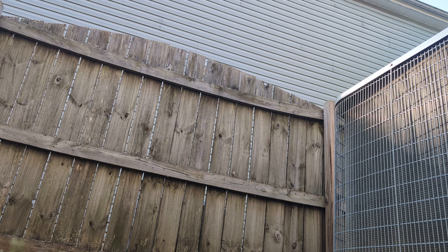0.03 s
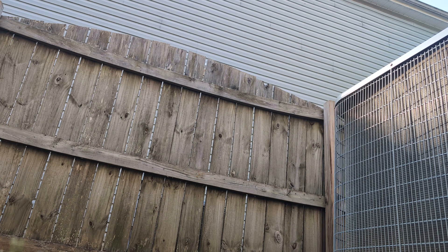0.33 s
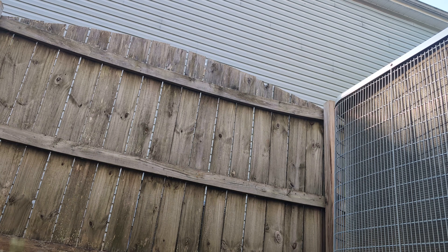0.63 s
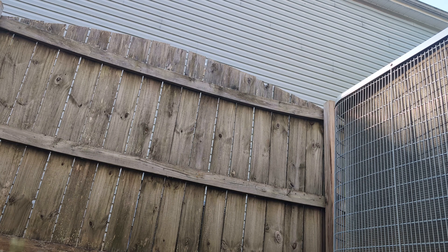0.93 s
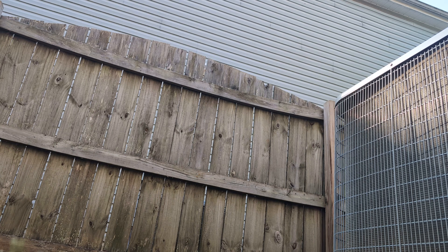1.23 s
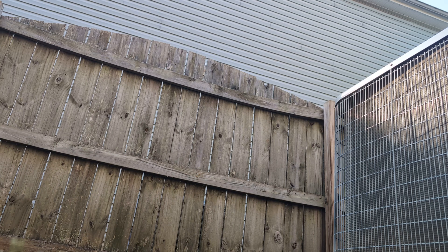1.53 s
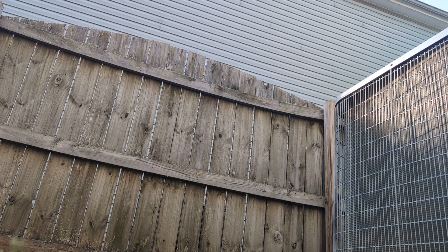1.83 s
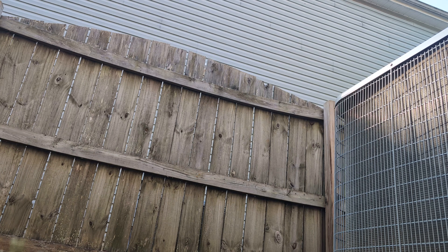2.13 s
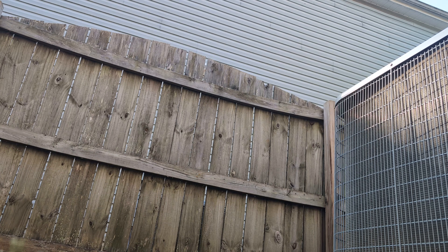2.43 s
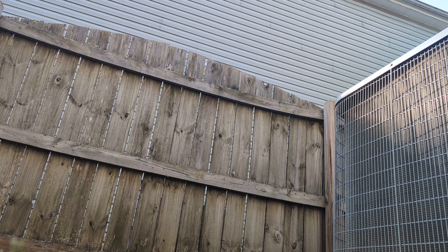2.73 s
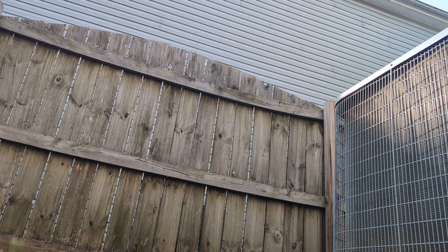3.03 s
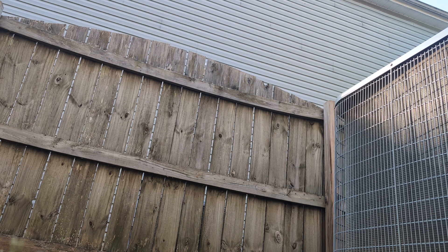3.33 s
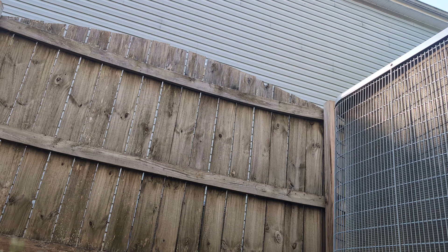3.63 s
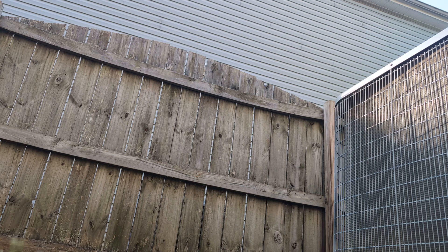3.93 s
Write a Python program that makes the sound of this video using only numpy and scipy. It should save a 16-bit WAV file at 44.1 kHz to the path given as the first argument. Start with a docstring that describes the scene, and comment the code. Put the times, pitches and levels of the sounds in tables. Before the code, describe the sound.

An outdoor air conditioner hums steadily, slightly to the right, with a fine buzz and rushing fan. At about 2.6 seconds it ticks off and the hum sinks, with a soft fizz of gas. Near 3 seconds the compressor clunks, then knocks and rattles ever more slowly, with a short, high whistling hiss. The fan coasts down, leaving faint knocks and a low yard rumble by 4 seconds.

```python
"""In a yard, beside a wooden fence, an air conditioner hums: compressor tones, a fine buzz and a
four-blade fan. The power drops out with a tick. The compressor (the pump for the cooling gas) stalls
with a clunk, knocks ever more slowly on its rebound and lets off a short whistling hiss, while the
fan coasts down into the low rumble of the yard."""
import sys
import numpy as np
from scipy import signal
from scipy.fft import rfft, irfft
from scipy.io import wavfile
from scipy.ndimage import map_coordinates

SR = 44100
rng = np.random.default_rng(int(sys.argv[2]) if len(sys.argv) > 2 else 0)


def master(y):
    """Save y as 16-bit WAV."""
    cut = np.clip(np.atleast_2d(y).T, -1, 1)
    pcm = np.round(cut * 32767)  # scale
    wavfile.write(sys.argv[1], SR, pcm.astype(np.int16))


N = 176400
T = np.arange(N) / SR
FREQS = np.maximum(np.fft.rfftfreq(2 * N, 1 / SR), 1)

OFF_S = 2.61  # the power is cut
SHAFT_HZ, BLADE_HZ, MAINS_HZ = 59.06, 74.7, 60


def compressor():
    """The shaft drones and buzzes, the motor hums; without power the shaft slows and all three fade."""
    # shaft tones (multiple of the shaft rate, level [dB])
    shaft_tones = [(1, -42), (6, -39.5), (7, -45), (8, -39.5), (9, -42), (10, -38), (12, -35.5), (13, -39),
                   (14, -36), (15, -41.5), (17, -47), (18, -46), (19, -33.5), (20, -43), (21, -35),
                   (22, -40.5), (24, -52.5)]
    # electric hum (multiple of the mains frequency, level [dB])
    hum_tones = [(2, -43.5), (4, -40)]
    # tone colour of the buzz (frequency [Hz], level [dB per Hz])
    buzz_spectrum = [(1000, -97), (1600, -76.5), (2400, -85.5), (3300, -94), (3900, -81), (4400, -83.5),
                     (4750, -88), (5250, -86.5), (6000, -84), (6400, -86.5), (7400, -90.5), (8600, -101),
                     (9600, -95), (11000, -99), (11700, -87), (12300, -102), (15000, -100)]
    # where the panels ring along (frequency [Hz], width [Hz], boost [dB])
    panels = [(2790, 92, 5.5), (3957, 91, -0.5), (5141, 80, 7.5), (5500, 120, 6), (5930, 260, 6.5),
              (6900, 80, 6)]
    stall_s, tone_fade_s, buzz_fade_s = 0.38, 0.2, 0.037
    age = since(OFF_S)
    hz = SHAFT_HZ * np.clip(1 - age / stall_s, 0, 1) * (1 + 0.000243 * walk(1.86))
    turn = np.cumsum(hz) / SR % 1
    boost_db = sum(db / (1 + (2 * (FREQS - centre) / width) ** 2) for centre, width, db in panels)
    buzz = colour(np.array([scrape(turn), scrape(turn)]), buzz_spectrum)
    buzz = filtered(buzz, amp(boost_db))
    hum = tones(np.full(N, MAINS_HZ), hum_tones, waver_db=2.5, waver_hz=4.8)
    shaft = tones(hz, shaft_tones, waver_db=0.5, waver_hz=2.0) * np.exp(-age / tone_fade_s)
    return (buzz + direct(hum)) * np.exp(-age / buzz_fade_s) + direct(shaft * np.sqrt(hz / SHAFT_HZ))


def scrape(turn):
    """The shaft makes the same rough rub on every turn, with a little random grit on top."""
    # rubs within one turn (position [turns], strength, width [turns])
    rubs = [(.15, 0.55, 0.042), (.25, 0.32, 0.11), (.5, 0.23, 0.049), (.8, 0.31, 0.057)]
    size = int(SR / SHAFT_HZ)
    angle = np.arange(size) / size
    pressure = 0.24 + sum(force * np.exp(-((angle - at) / width) ** 2) for at, force, width in rubs)
    phases = np.angle(rfft(pressure * rng.standard_normal(size)))
    cycle = irfft(np.exp(1j * phases), size)  # all overtones equally strong
    grit = 1 + 0.3 * rng.standard_normal(N)
    return map_coordinates(cycle / cycle.std(), [turn * size], mode="grid-wrap") * grit


def fan():
    """The blades hum and stir the air; as drag slows them, the hum sinks and the rush fades."""
    # blade tones (multiple of the blade rate, level [dB])
    blade_tones = [(.5, -57), (1, -24), (1.5, -36), (2, -39.5), (2.5, -40.5), (3, -37.5), (3.5, -49),
                   (4, -44.5)]
    # loudness of those tones (time [s], level [dB])
    blade_level = [(0, -2), (1, 0), (2.0, 0), (2.6, -1), (2.66, -10), (2.74, 3), (2.81, 0.5), (2.88, -5),
                   (3.2, -14), (4, -21)]
    # rushing air (frequency [Hz], level [dB per Hz])
    air_spectrum = [(20, -74.5), (35, -70), (50, -88), (66, -59.5), (110, -56), (160, -53.5), (240, -53),
                    (350, -57.5), (600, -58.5), (800, -62.5), (1000, -63), (1270, -67.5), (1550, -71.5),
                    (2200, -82), (4000, -86.5), (6000, -94.5), (8300, -111), (15500, -118)]
    half_speed_s = 2.0
    speed = 1 / (1 + since(OFF_S) / half_speed_s)
    hz = BLADE_HZ * speed * (1 + 0.0011 * walk(4.8))
    blades = tones(hz, blade_tones, waver_db=0.57, waver_hz=7.9)
    air = noise(air_spectrum) * amp(0.47 * walk(11.7))
    return direct(blades * fader(blade_level)) + air * speed ** 3


def knocks():
    """Each knock of the compressor cracks, rings its metal shell and sets the cabinet clattering."""
    # knocks (time [s], level [dB], extra for low notes [dB], clatter and crack [dB])
    hits = [(2.928, -21, 19, -20), (2.9712, 3, 5, -2), (2.9802, -13, 8, -5), (3.026, -6.5, -16, -9),
            (3.0592, -14, -12, -1), (3.0932, -9, -16, -16), (3.1395, -14, -10, -20), (3.1861, -10, -1, -7),
            (3.2413, -8.5, -2.5, -8), (3.605, -23, 7, -14), (3.912, -31, 14, -25)]
    # notes of the shell (frequency [Hz], level [dB], time to fade 60 dB [s], swell [s])
    shell_notes = [(446, -24, 0.059, .001), (583, -12.5, 0.019, 0.00045), (880, -20, 0.041, .001),
                   (1176, -6.5, 0.038, 0.00184), (1270, -17.5, 0.09, 0.002), (1347, -20, 0.067, .002),
                   (1800, -23.5, .06, 0.0027), (2008, -19.5, 0.064, 0.0068), (2824, -33.5, 0.14, 0.0015),
                   (3540, -36, 0.078, .001), (3820, -31, 0.045, .001), (4330, -33.5, 0.036, .001),
                   (6040, -45, .1, .002), (6550, -37, 0.022, 0.002)]
    # clattering cabinet (frequency [Hz], level [dB per Hz])
    clatter_spectrum = [(200, -66), (500, -58), (800, -38.5), (1020, -46), (1280, -38.5), (1560, -61),
                        (2000, -47.5), (2400, -62.5), (2850, -57), (3300, -67), (3780, -55.5), (4080, -66),
                        (4380, -62), (4900, -71.5), (5600, -69), (6600, -65), (8700, -80.5), (11700, -70),
                        (13000, -83), (15500, -83)]
    # dry crack of first contact (frequency [Hz], level [dB per Hz])
    crack_spectrum = [(800, -69), (2000, -51), (3100, -64), (3900, -57), (5400, -72), (6600, -68),
                      (9000, -80), (15000, -83)]
    out, clatter, crack = np.zeros((2, N)), noise(clatter_spectrum), noise(crack_spectrum)
    for start, db, low_db, clatter_db in hits:
        age = since(start)
        fence_tail = amp(-14) * np.exp(-age / 0.048)
        rattle = (1 - np.exp(-age / 0.001)) * (np.exp(-age / .006) + fence_tail)
        snap = (age > 0) * np.exp(-age / 0.0021)
        echo = amp(-11.0) * ring(start + 0.00196, shell_notes, low_db)
        shell = np.array([ring(start, shell_notes, low_db), echo])
        out += amp(db) * (shell + amp(clatter_db) * (clatter * rattle + crack * snap))
    return out


def vent():
    """A valve lets off a spurt of gas, with a breathy whistle that rises into place, and then shuts."""
    # hiss of the spurt (frequency [Hz], level [dB per Hz])
    hiss_spectrum = [(1500, -101), (2600, -80), (3600, -65), (5500, -69.5), (7500, -73), (9500, -74),
                     (11200, -73), (12300, -56.5), (13300, -71), (14000, -66), (14700, -68.5),
                     (15600, -57.5), (16200, -73)]
    open_s, rise_s, hold_s, fade_s = 3.032, 0.023, 0.0056, 0.024
    shut_s, choke_s = 3.125, .04
    whistle_hz, rise_hz, width_hz = 12380, 1705, 430
    age = since(open_s)
    opening = np.minimum(age / rise_s, 1)
    closing = np.exp(-since(open_s + rise_s + hold_s) / fade_s - since(shut_s) / choke_s)
    phase = 2 * np.pi * np.cumsum(whistle_hz - rise_hz * np.exp(-age / .011)) / SR
    whistle = np.array([walk(width_hz) * np.sin(phase) + walk(width_hz) * np.cos(phase)
                        for _ in range(2)])
    whistle *= amp(-25.5) * np.minimum(age / 0.011, 1) ** 4
    return (noise(hiss_spectrum) * opening ** 2 + whistle) * closing


def cooling_gas():
    """Gas rushes in the pipes, fizzes back and churns in the shell until the pressures even out."""
    # tone colour of each of the three (frequency [Hz], level [dB per Hz])
    rush_spectrum = [(1000, -100), (2500, -92.5), (4200, -80), (6200, -85), (7400, -84.5), (8500, -99),
                     (9600, -91.5), (11700, -88.5), (12500, -100), (15500, -99)]
    fizz_spectrum = [(1000, -91), (1600, -66.5), (2700, -81), (4000, -88), (8000, -101), (10000, -92),
                     (12500, -92), (14700, -92), (16000, -94)]
    churn_spectrum = [(80, -71), (220, -53.5), (330, -57), (470, -55), (700, -63.5), (950, -60),
                      (1250, -61), (1600, -73.5), (2400, -86.5), (4000, -93.5), (8000, -105), (15000, -115)]
    # loudness of each (time [s], level [dB])
    rush_level = [(0, -2), (2.6, -3.5), (2.72, 2), (2.81, -3.5), (2.92, -8), (3.15, -10.5), (3.3, -10),
                  (3.42, -20.5), (3.54, -20), (3.6, -31), (4, -48)]
    fizz_level = [(2.6, -60), (2.66, -7), (2.71, -4), (2.81, 1.5), (2.84, -7), (2.88, -7), (2.95, -21.5),
                  (3.4, -57)]
    churn_level = [(2.58, -45), (2.63, -2.5), (2.8, -0.5), (2.9, -0.5), (3.02, 2), (3.15, -2), (3.26, -4),
                   (3.38, -14), (3.65, -29), (4, -40)]
    rush = noise(rush_spectrum) * fader(rush_level) * amp(0.87 * walk(40))
    fizz = noise(fizz_spectrum) * fader(fizz_level) * amp(2.2 * walk(44.8))
    churn = noise(churn_spectrum) * fader(churn_level) * amp(1.6 * walk(35))
    return rush + fizz + churn


def switch_off():
    """The switch rings, and the casing lurches as the motor stops pushing."""
    # notes of each part (frequency [Hz], level [dB], time to fade 60 dB [s], swell [s])
    switch_notes = [(2680, -38.5, 0.093, 0.0036), (4323, -36, 0.065, .003), (5250, -38, .06, .003),
                    (7160, -28.5, 0.058, 0.0027), (7500, -32, 0.056, 0.0035)]
    casing_notes = [(186, -20, .15, .01), (228, -13.5, 0.14, 0.011), (276, -24, .1, 0.011)]
    return ring(OFF_S, switch_notes) + direct(ring(OFF_S, casing_notes))


def ticks():
    """The power switch and the valves make light, bright ticks."""
    # ticks (time [s], level [dB], fade [s])
    clicks = [(2.609, 3.5, 0.015), (2.952, -3, 0.0095), (3.2105, -3, 0.0037), (3.2795, -2, .005)]
    # their tone colour (frequency [Hz], level [dB per Hz])
    tick_spectrum = [(800, -61), (2600, -75.5), (5500, -74.5), (7400, -84.5), (9000, -81), (12000, -80.5),
                     (15500, -88)]
    bursts = sum(amp(db) * (1 - np.exp(-since(at) / .0008)) * np.exp(-since(at) / fade)
                 for at, db, fade in clicks)
    return noise(tick_spectrum) * bursts


def yard():
    """A low rumble fills the yard."""
    # tone colour of the rumble (frequency [Hz], level [dB per Hz])
    rumble_spectrum = [(20, -71.5), (40, -93), (56, -44), (95, -51), (135, -59.5), (300, -81.5),
                       (1000, -103), (4000, -108), (15000, -135)]
    # its loudness (time [s], level [dB])
    rumble_level = [(0, -2.5), (3.25, -0.5), (3.38, 2.5), (3.48, 0.5), (3.66, 1), (3.8, -5), (4, -5.5)]
    return noise(rumble_spectrum) * fader(rumble_level)


def ring(start, notes, low_db=0):
    """A struck part's notes swell and die away; low_db is added to those under 1000 Hz."""
    out, age = np.zeros(N), since(start)
    live = (age > 0) & (age < .3)
    age = age[live]
    for k, (hz, db, fade_s, swell_s) in enumerate(notes):
        shape = (1 - np.exp(-age / swell_s)) * np.exp(-np.log(1000) * age / fade_s)
        out[live] += (-1) ** k * amp(db + low_db * (hz < 1000)) * shape * np.sin(2 * np.pi * hz * age)
    return out


def tones(hz, table, waver_db, waver_hz):
    """Tones at multiples of one frequency, each wavering in loudness."""
    phase = 2 * np.pi * np.cumsum(hz) / SR
    out = np.zeros(N)
    for multiple, db in table:
        gain = amp(db + waver_db * walk(waver_hz))
        out += gain * np.sin(multiple * phase + 2 * np.pi * rng.random())
    return np.sqrt(2) * out


def amp(db):
    """Turn decibels into a gain to multiply by."""
    return 10 ** (np.asarray(db) / 20)


def across(table, column=1):
    """Fill in one column of a table for every frequency."""
    rows = np.array(table)
    return np.interp(np.log(FREQS), np.log(rows[:, 0]), rows[:, column])


def filtered(x, gain):
    """Apply a gain for each frequency."""
    mirrored = np.concatenate([x, x[..., ::-1]], axis=-1)
    return irfft(rfft(mirrored) * gain)[..., :N]


def colour(x, spectrum):
    """Give a tone colour to a sound that is equally strong at all frequencies."""
    return filtered(x, amp(across(spectrum)) * np.sqrt(SR / 2))


def noise(spectrum):
    """Two unrelated noises of one tone colour: a direct row and a scattered row."""
    return colour(rng.standard_normal((2, N)), spectrum)


def fader(table):
    """A gain that follows points of (time [s], level [dB])."""
    return amp(np.interp(T, *np.array(table).T))


def walk(rate_hz):
    """A smooth random wobble of typical size 1; a higher rate wobbles faster."""
    x = irfft(rfft(rng.standard_normal(N)) * np.exp(-(FREQS[::2] / rate_hz) ** 2 / 2), N)
    return (x - x.mean()) / x.std()


def since(start):
    """Seconds since a moment, zero before it."""
    return np.maximum(T - start, 0)


def direct(x):
    """A sound that arrives with no scattered part."""
    return np.array([x, np.zeros(N)])


def scene():
    """The unit stands to the right: the left microphone hears it later, weaker and partly scattered."""
    # left side against the right (frequency [Hz], level [dB], likeness [0-1])
    left_side = [(60, -1.84, 1), (250, -1.5, 0.98), (550, -1.5, .99), (850, -3, 0.85), (1135, -7, 1),
                 (1260, -10, 0.8), (1750, -6.5, 0.2), (2600, -2.5, 0), (3760, -1, 0.28), (4700, -10.5, 0.4),
                 (5450, -4, 0.1), (7000, -4, 0.2), (8500, -1.5, 0), (10300, -2.5, 0.3), (11700, -9.5, .3),
                 (13000, -13.5, .1), (15500, -10, .1)]
    # how late the left side hears it (frequency [Hz], delay [s])
    left_delay = [(100, 0.0003), (550, 0.00031), (1100, 0.00038), (4000, 0.000468)]
    rumble = yard()
    unit = compressor() + cooling_gas() + fan() + switch_off() + knocks() + ticks() + vent()
    right, scattered = unit + rumble
    gain, likeness = amp(across(left_side)), np.clip(across(left_side, column=2), 0, 1)
    delay_s = np.interp(FREQS, *np.array(left_delay).T)
    left = filtered(right, gain * likeness * np.exp(-2j * np.pi * FREQS * delay_s))
    left += filtered(scattered, gain * np.sqrt(1 - likeness ** 2))
    return np.array([left, right])


def record(dry):
    """Cut the highest treble, above 15850 Hz."""
    return signal.sosfilt(signal.ellip(10, .2, 80, 15850, fs=SR, output="sos"), dry)


dry = scene()
out = record(dry)
master(out)
```